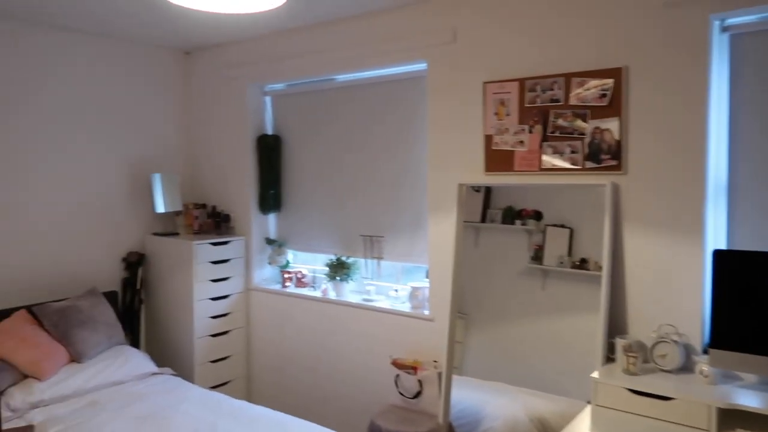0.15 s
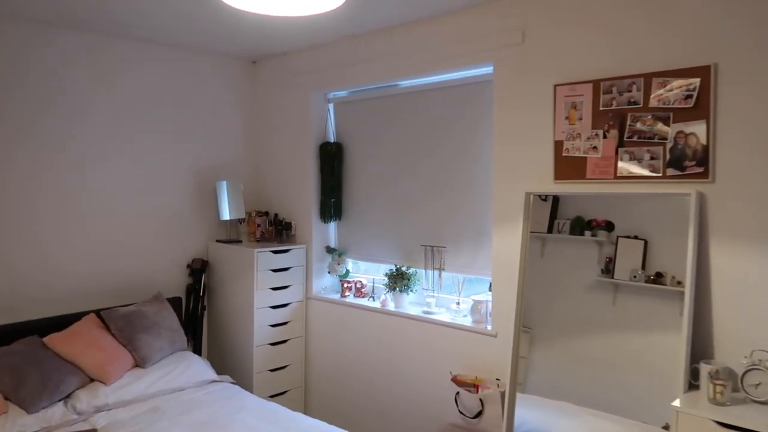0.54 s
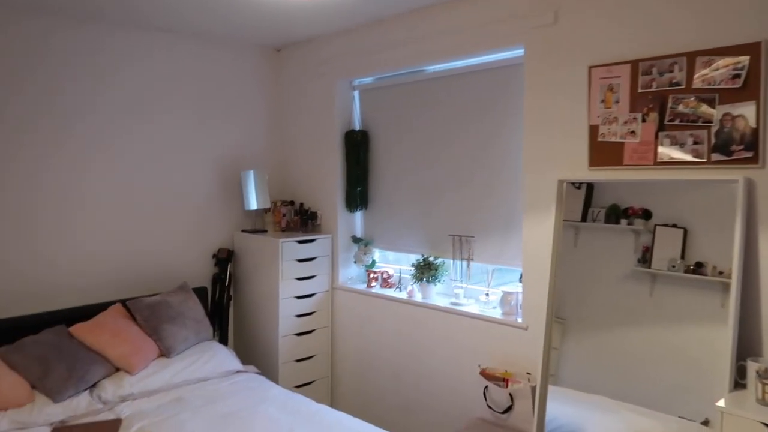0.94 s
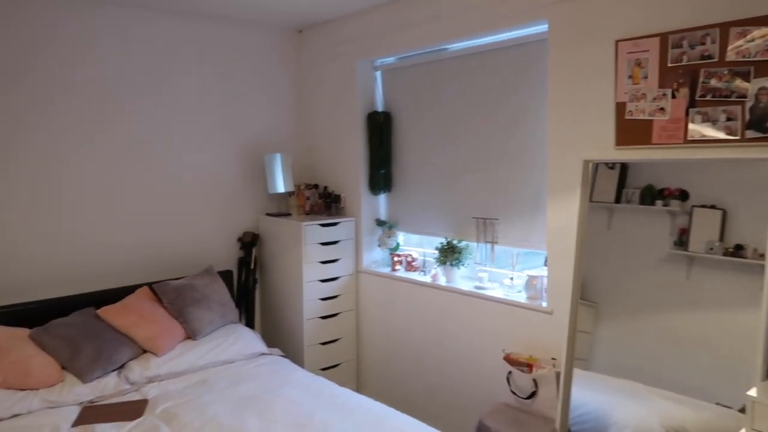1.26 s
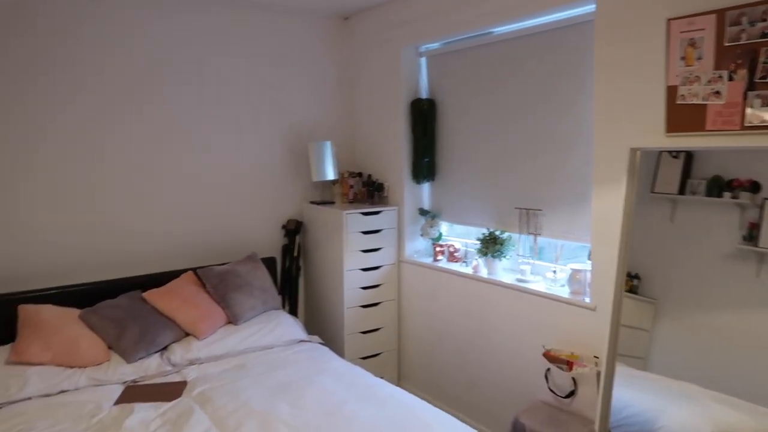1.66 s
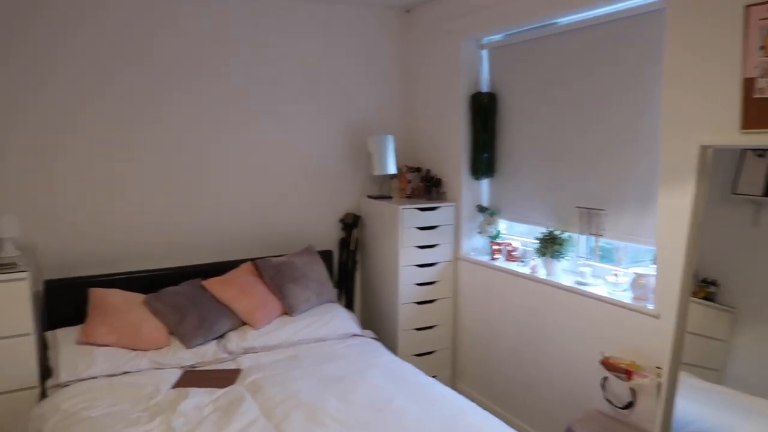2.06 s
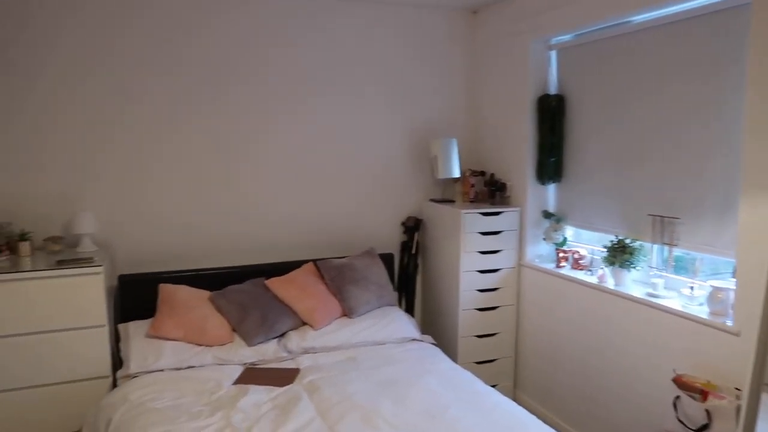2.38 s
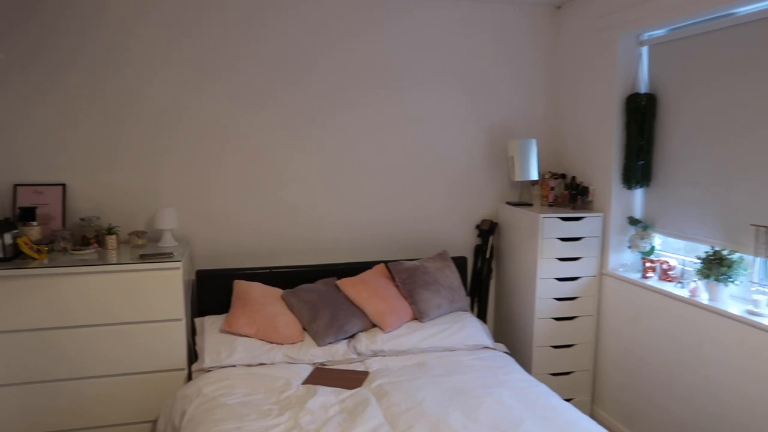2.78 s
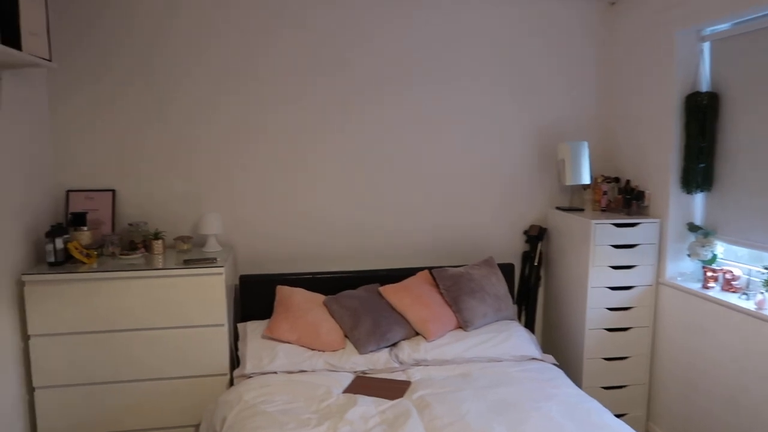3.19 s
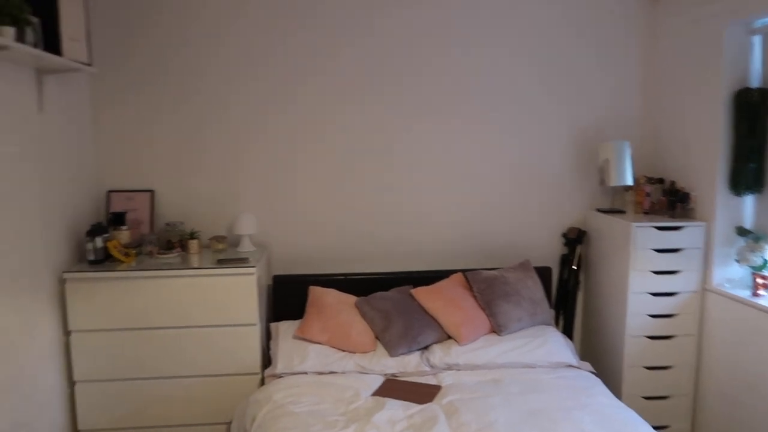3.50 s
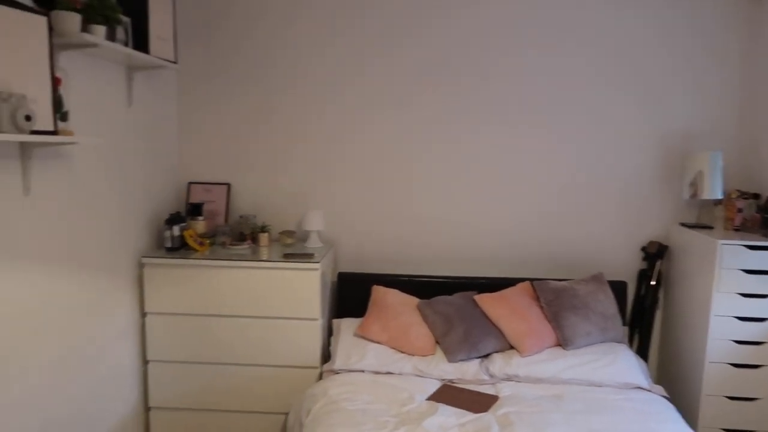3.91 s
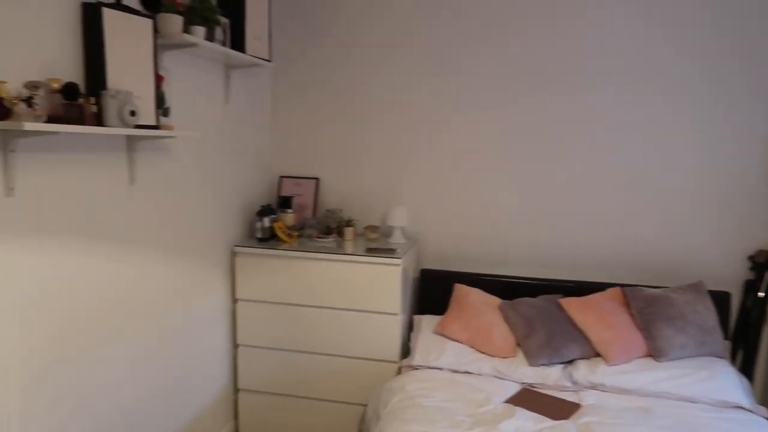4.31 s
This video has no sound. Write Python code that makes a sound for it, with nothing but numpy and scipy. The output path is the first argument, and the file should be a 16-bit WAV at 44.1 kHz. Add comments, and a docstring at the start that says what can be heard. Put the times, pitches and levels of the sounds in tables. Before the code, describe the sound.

Slow, soft footsteps thud on a carpeted bedroom floor while a small camera's lens motor ticks faintly over low room hum and hiss.

```python
"""Bedroom walk with a small camera

Someone carries a small camera slowly across a carpeted bedroom. Feet thud on the boards under the
carpet: soft blows ring the floor's modes and leave dying room noise. Clothes swish as filtered noise,
the mains hums, the camera body ticks and its electronics whine thinly. The lens motor ticks as short
ringing modes, in opposite phase at the two microphones, over room rumble and microphone hiss."""
import sys
import numpy as np
from scipy import signal
from scipy.io import wavfile

SR = 44100
rng = np.random.default_rng(int(sys.argv[2]) if len(sys.argv) > 2 else 0)


def unload_wav(signal):
    """Save mono or channel-first audio to the path in sys.argv[1] as 16-bit WAV at rate SR, clipped to [-1, 1]."""
    wavfile.write(
        sys.argv[1],
        SR,
        np.round(np.clip(np.atleast_2d(signal).T, -1, 1) * 32767).astype(np.int16),
    )


N = 196200   # length in samples


def from_db(db):
    """Turns decibels into a gain."""
    return 10 ** (np.asarray(db) / 20)


def rms_one(x):
    """Scales a sound so that its rms (its average strength) is 1."""
    return x / np.sqrt(np.mean(x ** 2) + 1e-20)


def at_hz(points, hz, column=1):
    """Reads a column of a table between its rows, with frequency on a log axis."""
    points = np.array(points)
    return np.interp(np.log(hz), np.log(points[:, 0]), points[:, column])


def band(x, low_hz, high_hz):
    """Keeps the frequencies between two edges (Butterworth band-pass)."""
    edges = [low_hz, min(high_hz, 0.45 * SR)]
    return signal.sosfilt(signal.butter(2, edges, "band", fs=SR, output="sos"), x)


def drift(rate_hz):
    """Slow random wandering with rms 1: smoothed noise, made at every 40th sample and joined by lines."""
    r = np.exp(-2 * np.pi * rate_hz * 40 / SR)
    noise = rng.standard_normal(N // 40 + 2002)
    slow = signal.lfilter([1], [1, -2 * r, r * r], noise)[2000:]   # skip the filter's start
    return np.interp(np.arange(N) / 40, np.arange(len(slow)), rms_one(slow))


def clicks(seconds, db):
    """Single-sample clicks at the given moments, over a floor that is almost zero."""
    out = np.full(N, 1e-18)
    places = np.minimum((np.asarray(seconds) * SR).astype(int), N - 1)
    np.add.at(out, places, from_db(db))
    return out


def ring(x, hz, t60):
    """A struck mode: each click starts a sine that dies by 60 dB in t60 seconds."""
    r = from_db(-60 / (t60 * SR))
    w = 2 * np.pi * hz / SR
    return signal.lfilter([0, np.sin(w)], [1, -2 * r * np.cos(w), r * r], x)


def soften(x, seconds):
    """One-pole smoothing: a soft contact spreads a click in time."""
    r = np.exp(-1 / (seconds * SR))
    return signal.lfilter([1 - r], [1, -r], x)


def hiss(patchy_db):
    """Room rumble, alike on both sides, and microphone hiss, unrelated, built in half-octave bands."""
    # Each row: frequency in Hz, level in dB per Hz relative to the other rows.
    colour = [(20, -5), (45, -35), (75, -7.5), (105, -12.5), (140, -12.5), (300, -11.5), (480, -13),
              (620, -18), (1000, -18.5), (2500, -24.5), (5000, -29.5), (9000, -38), (12000, -40.5),
              (15000, -73)]
    # Each row: frequency in Hz, likeness of left and right (1 = the same, 0 = unrelated).
    likeness = [(60, 0.91), (110, 1), (200, 0.39), (370, 0.23), (700, 0.014), (15000, 0.0056)]
    level_db = -54   # rms of the whole
    out = 0
    together = drift(2)
    edges = 20 * 2 ** np.arange(0, 10.1, 0.5)
    white = rng.standard_normal((2, 2, N + 8000))   # neighbouring bands take turns with two noises
    for k, (low, high) in enumerate(zip(edges, edges[1:])):
        mid, side = band(white[k % 2], low, high)[:, 8000:]   # skip the filter's start
        hz = np.sqrt(low * high)
        alike = np.clip(at_hz(likeness, hz), -1, 1)
        wander_db = patchy_db * (0.14 * together + drift(29))
        gain = from_db(at_hz(colour, hz) + wander_db)
        both_sides = np.sqrt(1 + alike) * mid + np.sqrt(1 - alike) * side * [[1], [-1]]
        out = out + gain * both_sides
    return from_db(level_db) * rms_one(out)


def mains():
    """The mains hum, and a buzz about an octave higher that wavers in level and pitch."""
    # The buzz changes with the place in the room. Each row: time in seconds, level in dB.
    buzz_levels = [(0, -59), (.4, -62.5), (.8, -66), (1.1, -70.5), (1.5, -65.5), (2.1, -54), (2.7, -59.5),
                   (3.4, -60.5), (3.6, -89), (4.1, -70.5), (4.45, -61)]
    hum_hz, hum_db, buzz_hz = 50, -68, 101
    t = np.arange(N) / SR
    hum = from_db(hum_db + 0.74 * drift(3.1)) * np.sin(2 * np.pi * hum_hz * t)
    turns = np.cumsum(buzz_hz + 2.0 * drift(6.3)) / SR
    buzz_db = np.interp(t, *np.transpose(buzz_levels)) + 4.3 * drift(5.9)
    buzz = from_db(buzz_db) * np.sin(2 * np.pi * turns)
    return np.sqrt(2) * (hum + buzz)


def whine():
    """Camera electronics: two thin steady tones, a quarter turn apart in the two channels."""
    # Each row: frequency in Hz, level in dB (the sine's peak is twice this).
    tones = [(13000, -90), (13025, -91)]
    t = np.arange(N) / SR
    turn = np.array([[0], [np.pi / 2]])
    return sum(2 * from_db(db) * np.sin(2 * np.pi * hz * t + turn) for hz, db in tones)


def camera_body():
    """Ticks of the camera body: each click rings one short mode."""
    # The pair near 2.59 s belongs to a loud step of the lens motor.
    # Each row: time in seconds, level in dB before the band-pass, pitch in Hz.
    body_ticks = [(1.4450, -50, 4960), (1.446, -52, 7300), (2.589, -49, 4480), (2.591, -50, 5140)]
    ringing = sum(ring(clicks([s], db), hz, t60=0.011) for s, db, hz in body_ticks)
    return band(ringing, 4400, 7500)


def clothes():
    """Swishing cloth: dense random fibre grains under a smooth rise and fall."""
    # Each row: middle in seconds, half length in seconds, level in dB, low edge in Hz, high edge in Hz.
    swishes = [(0.338, 0.071, -60.5, 400, 6000), (0.685, 0.085, -58.5, 377, 4970),
               (0.79, 0.02, -64, 686, 6000), (2.648, 0.062, -58.5, 890, 6000),
               (2.918, 0.11, -61, 2200, 8660), (3.337, 0.025, -57.5, 300, 3500),
               (4.12, 0.3, -75, 596, 5000)]
    out = np.zeros(N)
    t = np.arange(N) / SR
    grains = rng.standard_normal(N) * from_db(1.5 * drift(60))
    grains = signal.lfilter([1], [1, -0.85], grains)   # the swish is duller than white noise
    for middle, half, level_db, low_hz, high_hz in swishes:
        stroke = np.exp(-((t - middle) / half) ** 2)
        out += from_db(level_db) * stroke * rms_one(band(grains, low_hz, high_hz))
    return out


def motor_steps():
    """Times and levels of the motor's steps: focusing bouts on the frame clock, idle steps, a run, strays."""
    # Bouts of focusing; one that ends before it starts gives no steps.
    # Each row: start in seconds, end in seconds, seconds between steps, level in dB,
    # delay of the second step in seconds, level of the second step in dB.
    focusing = [(.349, .469, .04, -47, .007, -57), (.509, .549, .04, -66, .007, -51),
                (.589, .709, .04, -51, .007, -52), (1.829, 1.989, .04, -63, .007, -53),
                (2.029, 2.109, .04, -50, .007, -48), (2.589, 2.589, .04, -40, .023, -62),
                (2.629, 2.949, .08, -51, 0.026, -51), (3.069, 3.229, .16, -59, .023, -51),
                (3.709, 3.709, .04, -56, .023, -51), (4.109, 4.149, .04, -53, 0.012, -53),
                (4.189, 4.309, .04, -48, .007, -50), (4.349, 3.9, .04, -56, .007, -60)]
    frame_s, first_frame_s = 0.04, 0.029   # the lens motor is clocked by the picture rate
    third_step_s, third_step_share = 0.017, 0.35   # some frames get a third step
    idle_frames, idle_db = 4, -57.5   # one idle step every few frames
    strays_per_s, stray_db = 5.9, -53
    whirr_start_s, whirr_end_s, whirr_steps, whirr_db = 0.16, 0.235, 16, -54   # a short fast run
    spread_db = 2.5
    rows = []
    for start, end, spacing, first_db, delay, second_db in focusing:
        ends = np.array([start, end])
        first, last = np.round((ends - first_frame_s) / frame_s).astype(int)
        every = max(round(spacing / frame_s), 1)
        for frame in range(first, last + 1, every):
            s = first_frame_s + frame_s * frame
            rows += [(s, first_db), (s + delay, second_db)]
            if rng.random() < third_step_share and every == 1:
                rows += [(s + third_step_s, first_db)]
    idle = np.arange(first_frame_s + 2 * frame_s, N / SR, idle_frames * frame_s)
    strays = np.cumsum(rng.exponential(1, size=60)) / strays_per_s
    whirr = rng.uniform(whirr_start_s, whirr_end_s, size=whirr_steps)
    rows += [(s, idle_db) for s in idle]
    rows += [(s, stray_db) for s in strays[strays < N / SR]]
    rows += [(s, whirr_db) for s in whirr]
    s, db = np.transpose(rows)
    return s, db + spread_db * rng.standard_normal(len(s))


def lens_motor():
    """Every motor step knocks the lens barrel's short modes; the housing passes only their band."""
    # Each row: frequency in Hz, level in dB, time to die by 60 dB in seconds.
    barrel_modes = [(3250, -13, 0.015), (4180, 2, 0.02), (4470, -6, .02), (4480, -9, .018)]
    s, db = motor_steps()
    knocks = np.zeros(N)
    for hz, level_db, t60 in barrel_modes:
        uneven_db = rng.normal(0, 0.95, len(s))
        knocks += ring(clicks(s, db + level_db + uneven_db), hz, t60)
    return band(knocks, 2700, 4140)


def blows(hz, spread_db):
    """The clicks of all footfalls as felt at one frequency: a low thump plus a knock."""
    # Each row: time in seconds, thump level in dB, thump peak in Hz, knock level in dB,
    # knock peak in Hz, fall above the knock's peak in dB per octave.
    footfalls = [(0.528, -52, 85, -55.5, 330, 5.5), (.564, -46, 105, -64, 220, 15),
                 (1.2536, -50.5, 130, -36, 830, 9), (1.342, -33.5, 98, -30, 440, 6),
                 (2.159, -24.5, 81, -33, 554, 36), (2.168, -24, 52, -38.5, 297, 27),
                 (2.516, -42, 53.3, -55.5, 454, 5), (2.584, -55, 90.5, -74, 300, 9),
                 (2.646, -47.5, 60, -77, 330, 12), (2.699, -58, 55, -64, 455, 6),
                 (2.929, -55, 100, -52.5, 695, 18), (3.469, -68, 40, -54.5, 447, 5.5),
                 (3.543, -50.5, 70, -47, 400, 15), (3.8220, -39, 54.3, -31, 430, 7.5)]
    thump_below_db, thump_above_db, knock_below_db = 16.5, 9.5, 8.5   # fall per octave from the peak
    s, thump_db, thump_hz, knock_db, knock_hz, knock_above_db = np.transpose(footfalls)
    thump_octaves = np.log2(hz / thump_hz)
    knock_octaves = np.log2(hz / knock_hz)
    thump = thump_db - np.where(thump_octaves > 0, thump_above_db, -thump_below_db) * thump_octaves
    knock = knock_db - np.where(knock_octaves > 0, knock_above_db, -knock_below_db) * knock_octaves
    db = 10 * np.log10(from_db(2 * thump) + from_db(2 * knock))   # add the two powers
    return clicks(s, db + spread_db * rng.standard_normal(len(s)))


def room_tail():
    """The room answers each blow with noise that dies band by band."""
    # Each row: frequency in Hz, time to die by 60 dB in seconds, level in dB.
    room = [(29.7, 1.36, -11.5), (72, 0.31, -10.5), (203, 0.37, 1), (590, 0.22, -9.5), (1500, 0.23, -5),
            (2910, 0.2, -3), (6000, 0.034, -55)]
    out = np.zeros(N)
    edges = 23 * 2 ** np.arange(0, 8.1, 0.5)
    white = rng.standard_normal((2, N))   # neighbouring bands take turns with two noises
    for k, (low, high) in enumerate(zip(edges, edges[1:])):
        hz = np.sqrt(low * high)
        decay = from_db(-60 / (at_hz(room, hz) * SR))
        dying = signal.lfilter([1], [1, -decay], blows(hz, spread_db=0.5))
        noise = rms_one(band(white[k % 2], low, high))
        out += from_db(at_hz(room, hz, column=2)) * soften(dying, 0.0017) * noise   # a quick soft rise
    return out


def footsteps():
    """Each blow rings the modes of floor and room, echoes nearby and leaves a tail of room noise."""
    # Floor boards and room. Each row: frequency in Hz, level in dB, time to die by 60 dB in seconds.
    floor_modes = [(32.4, -6.5, 1), (45.7, -4.5, 0.25), (70.1, 8, 0.24), (86.7, -2, 0.68),
                   (110.2, -9, 0.37), (118.8, 10, 0.15), (146, -23, 0.14), (169, -24, 0.45),
                   (220.5, 2.5, 0.26), (248, 11, 0.083), (286.4, 3.5, 0.19), (307.2, 2, 0.18),
                   (397.7, -1.5, 0.15), (402.6, -7.5, 0.14), (457.7, -9, 0.34), (514, 2.5, 0.091),
                   (514, -32, 0.084), (670, 0.5, 0.03), (763, 11.5, 0.018), (880, -2, .045),
                   (990, -2, .045), (1120, -4, .045), (1310, -6, .04), (1600, -10, .03), (2140, -7, 0.027),
                   (2200, 2.5, 0.045), (2350, -18, 0.059), (2960, -8, .04), (3500, -2, 0.033)]
    # Nearest walls and furniture. Each row: delay in seconds, level in dB.
    echoes = [(.0047, -12.5), (0.0112, -19), (0.026, -20.5)]
    in_step_hz = 160   # modes above this start in step: a sharp first pulse
    out = np.zeros(N)
    for k, (hz, level_db, t60) in enumerate(floor_modes):
        # the carpet stretches the push over part of a cycle
        push = soften(blows(hz, spread_db=1.25), 0.088 / hz)
        sign = -1 if hz > in_step_hz else (-1) ** (k + 1)
        ringing = band(ring(push, hz, t60), 0.65 * hz, 5.5 * hz)   # each radiates near its pitch
        out += sign * from_db(level_db) * ringing
    upper = band(out, 163, 6900)   # only the short waves come back as distinct echoes
    for delay, echo_db in echoes:
        out += from_db(echo_db) * np.roll(upper, int(delay * SR))
    return out + room_tail()


def scene():
    """Close microphones: air-borne sound is alike in the bass and differs a little in the treble."""
    side_db, side_hz = -22, 2520
    air = footsteps() + clothes() + camera_body()
    treble = signal.butter(1, side_hz, "high", fs=SR, output="sos")
    apart = signal.sosfilt(treble, np.roll(air, 30))   # 30 samples late
    side = from_db(side_db) * apart + lens_motor()
    opposite = side * [[1], [-1]]   # plus on the left, minus on the right
    return air + mains() + whine() + opposite + hiss(patchy_db=0.85)


def low_pass(x):
    """Removes everything above the highest recorded frequency."""
    return signal.sosfilt(signal.butter(12, 15210, fs=SR, output="sos"), x)


def record(dry):
    """The camera's last step: turns the finished mix into the sound that is heard."""
    return low_pass(dry)


dry = scene()
out = record(dry)
unload_wav(out)
```